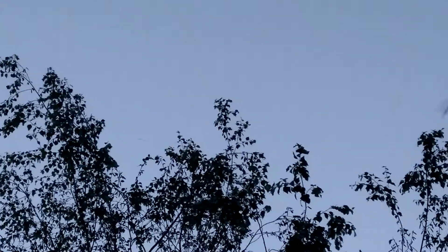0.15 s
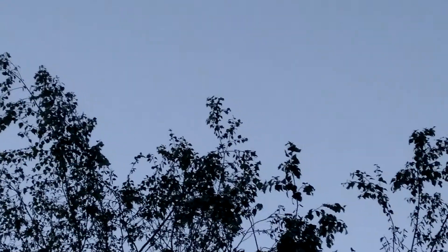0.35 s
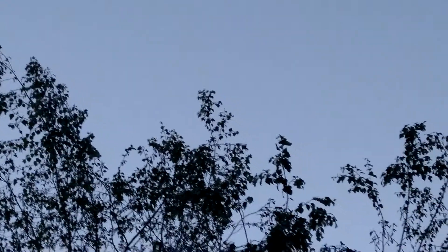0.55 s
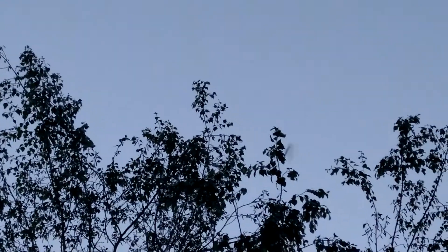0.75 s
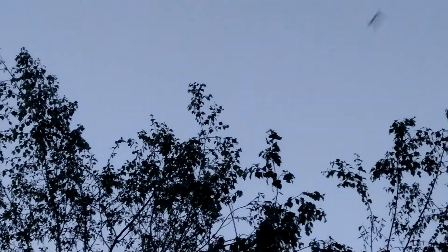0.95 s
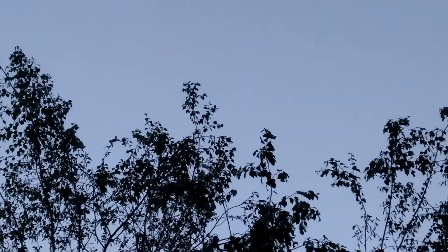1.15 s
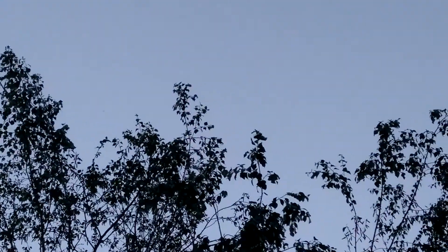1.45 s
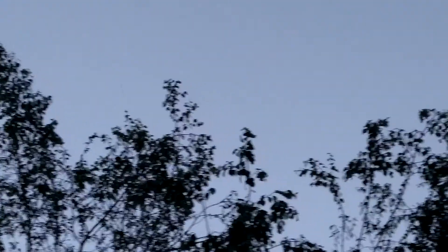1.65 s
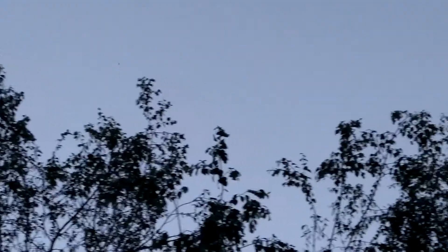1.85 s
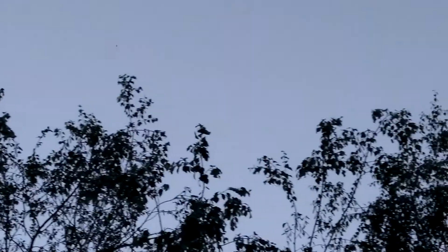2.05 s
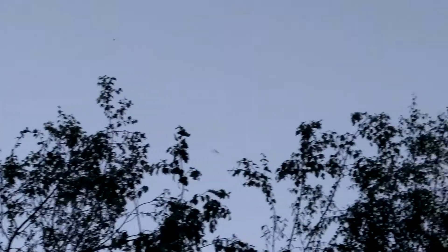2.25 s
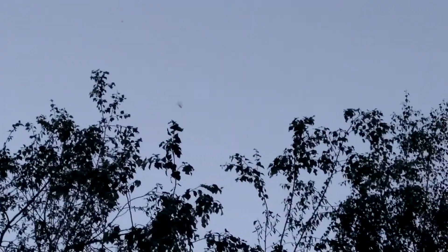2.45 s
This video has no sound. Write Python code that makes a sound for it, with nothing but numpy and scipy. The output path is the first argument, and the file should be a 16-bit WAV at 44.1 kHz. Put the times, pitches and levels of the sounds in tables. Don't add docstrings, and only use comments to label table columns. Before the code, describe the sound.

Outdoor stereo pickup of screaming swifts: shrill trilled whistles swell to a loud, hoarse burst early on, then thin into weaker overlapping calls, with faint distant engine rumble and a tiny bird warble at the end.

```python
import sys
import numpy as np
from scipy import signal
from scipy.fft import rfft, irfft, next_fast_len
from scipy.io import wavfile
from scipy.ndimage import uniform_filter1d, map_coordinates

SR = 44100
rng = np.random.default_rng(int(sys.argv[2]) if len(sys.argv) > 2 else 0)


def level_to_linear(level):
    exponent = np.asarray(level, float) / 20
    return 10 ** exponent


def generate_wav(signal):
    frames = np.transpose(np.atleast_2d(signal))
    scaled = np.clip(frames, -1, 1) * 32767
    pcm = np.round(scaled).astype(np.int16)
    wavfile.write(sys.argv[1], SR, pcm)


N = 114660
T = np.arange(N) / SR


def unit(x):
    return x / np.sqrt(np.mean(x ** 2) + 1e-20)


def along(points, hz):
    f, v = np.transpose(points)
    return np.interp(np.log(hz + 1), np.log(f + 1), v)


def closed(points):
    return lambda hz: level_to_linear(along(points, hz)) * (hz > points[0][0]) * (hz < points[-1][0])


def filtered(x, response):
    m = next_fast_len(N + 8192)
    return irfft(rfft(x, m) * response(np.fft.rfftfreq(m, 1 / SR)), m)[..., :N]


def wobble(rate_hz, size=N):
    knots = rng.standard_normal(int(size * 400 / SR) + 4)
    return map_coordinates(knots, [T[:size] * min(rate_hz, 400)])


def add(sky, a, voice):
    sky[:, a:a + voice.shape[1]] += voice[:, :N - a]
    return sky


def town_hum():
    # frequency in Hz, density in dB per Hz
    hum_spectrum = [(47, 7), (80, -2), (206, -1.5), (296, -11), (344, -1), (420, -12.5), (635, -10),
                    (2200, -14.5), (4400, -21), (5460, -77), (9240, -120)]
    # frequency in Hz, left-right likeness -1 to 1
    likeness = [(60, 0.57), (240, 0.91), (950, 0.07), (3770, -0.5), (15000, 1)]

    def response(hz):
        turn_rad = np.arccos(np.clip(along(likeness, hz), -1, 1)) / 2
        return closed(hum_spectrum)(hz) * np.array([np.cos(turn_rad), np.sin(turn_rad)])

    mid, side = filtered(rng.standard_normal((2, N)), response)
    level_db = -71 + 0.17 * wobble(5.9) + 1.2 * wobble(6.5)
    return level_to_linear(level_db) * unit(np.array([mid + side, mid - side]))


def engine():
    # time in seconds, load in dB
    load = [(0.0, -100), (0.05, -60), (0.1, -78), (0.73, -63.5), (0.99, -69), (1.059, -60), (1.101, -78),
            (1.61, -104), (1.68, -71), (1.89, -84), (2.579, -58.5), (2.6, -60)]
    centre_hz, width_hz = 58.7, 8.3
    s, db = np.transpose(load)
    noise = rng.standard_normal(N) + 0.096 * rng.standard_normal((2, N))
    throb = unit(filtered(noise, lambda hz: 1 / (1 + ((hz - centre_hz) / width_hz) ** 2)))
    return level_to_linear(np.interp(T, s, db)) * throb


def air_hiss():
    # frequency in Hz, density in dB per Hz
    hiss_spectrum = [(3500, -16), (8000, 2), (9800, -18), (11800, -62), (12300, -42), (15600, -49)]
    return level_to_linear(-68.5) * unit(filtered(rng.standard_normal((2, N)), closed(hiss_spectrum)))


def town():
    return (town_hum() + engine()) * level_to_linear([[1.2], [-1.2]]) + air_hiss()


def puffs():
    # centre in seconds, length in seconds, centre in Hz, width in Hz, level in dB
    swells = [(0.057, 0.045, 124, 193, -67.5), (0.669, 0.1, 230, 970, -59), (0.983, 0.13, 370, 84, -63.5),
              (1.156, 0.053, 963, 213, -74), (2.346, 0.062, 353, 98, -69.5),
              (2.394, 0.0072, 1260, 1484, -70), (0.554, 0.19, 380, 553, -73),
              (0.865, 0.42, 2740, 2580, -71), (1.726, 0.46, 3510, 1100, -72),
              (2.511, 0.0051, 9300, 2500, -80), (2.484, 0.0078, 1410, 1720, -64)]
    out = np.zeros((2, N))
    for s, length_s, centre_hz, width_hz, db in swells:
        a, b = rng.standard_normal((2, N))
        ears = np.array([a + 0.84 * b, a - 0.41 * b])
        band = filtered(ears, lambda hz: hz / (hz + 60) / (1 + ((hz - centre_hz) / width_hz * 2) ** 2))
        out += level_to_linear(db) * unit(band) * np.exp(-((T - s) / length_s * 2) ** 2)
    return out * level_to_linear([[1.5], [-1.5]])


def warbler():
    # time in seconds, pitch in Hz, level in dB
    song = [(2.43, 4130, -75), (2.462, 4430, -63.5), (2.484, 4060, -65), (2.5, 4280, -57.5),
            (2.516, 4420, -63), (2.546, 4200, -65), (2.558, 4270, -65), (2.564, 4520, -62),
            (2.6, 4300, -63)]
    s, hz, db = np.transpose(song)
    pitch_hz = np.interp(T, s, hz) + 22 * wobble(180)
    level_db = np.interp(T, s, db) - 7 + 2.3 * wobble(80)
    tone = np.sin(2 * np.pi * np.cumsum(pitch_hz) / SR) * level_to_linear(level_db)
    return tone * np.clip((T - s[0]) / 0.01, 0, 1) * level_to_linear([[3], [-3]])


def echo(x):
    # frequency in Hz, t60 in seconds
    decay = [(2000, 0.62), (6000, 0.54), (12000, 0.45)]
    hz, t, z = signal.stft(rng.standard_normal((2, SR // 2)), SR, nperseg=256)
    tail = signal.istft(z * level_to_linear(-60 * t / along(decay, hz)[:, None]), SR, nperseg=256)[1]
    return signal.fftconvolve(x, tail / np.linalg.norm(tail[0]), axes=1)[:, :N]


def breath(birds):
    # frequency in Hz, level in dB
    breath_spectrum = [(2400, -16.5), (3300, -32), (4000, -48), (6800, -0.5), (7900, -9), (9300, -6),
                       (11500, -5), (12200, -22)]
    hoarse_start_s, hoarse_end_s, fade_s = 0.425, 2.01, 0.032
    power = uniform_filter1d(uniform_filter1d(birds ** 2, 2500), 2500)
    effort = np.abs(power) ** 0.5
    hoarse = np.clip(np.minimum(T - hoarse_start_s, hoarse_end_s - T) / fade_s, 0.25, 1)
    hiss = unit(filtered(rng.standard_normal((2, N)), closed(breath_spectrum)))
    return level_to_linear(-22.5) * 0.021 * (effort / 0.0049) ** 0.45 * hoarse * hiss


def scream(sky, start_s, hz, gain, pan_db, octave_db, third_db, between_db, rasp_db, depth, jitter):
    flutter_hz, flutter_depth, flutter_bend_rad, flutter_drift = 255, 0.71, 0.27, 0.0629
    pitch_jitter, flicker_db, own_ear_db = 0.99, 1.5, 4
    rasp_width_hz, overtone_rasp_db = 480, 0
    half_db = -45.5
    n = SR * 2 // 3
    a = max(int(start_s * SR), 0)

    def fit(v):
        return np.pad(v[a:a + n], (0, max(a + n - N, 0)), "edge")

    hz, gain, pan_db = fit(hz), fit(gain), fit(pan_db)

    def even(v):
        return v * np.sqrt(np.sum(gain ** 2) / np.sum(gain ** 2 * v ** 2, -1, keepdims=True))

    drift = 1 + flutter_drift * wobble(30.55, size=n)
    flutter = 2 * np.pi * (rng.random() + np.cumsum(flutter_hz * drift) / SR)
    phase = 2 * np.pi * np.cumsum(hz * (1 + pitch_jitter * jitter * wobble(149.88, size=n))) / SR
    bend = flutter_bend_rad * depth * np.sin(flutter + 0.3)
    chop = 1 + flutter_depth * depth * np.cos(flutter)

    skirt = np.exp(-(np.fft.rfftfreq(n, 1 / SR) / rasp_width_hz) ** 2)
    rasp = unit(irfft(rfft(rng.standard_normal((2, n))) * skirt, n))

    own_ears = np.array([wobble(71.5, size=n), wobble(68.7, size=n)])
    turns_db = flicker_db * wobble(53.05, size=n) + own_ear_db * own_ears
    ears = level_to_linear(3.65 * np.tanh(np.maximum(turns_db, 0) / 3) + np.minimum(turns_db, 0))

    def part(half_steps):
        return np.sin(half_steps * phase / 2 + bend)

    whistle = even(chop * ears * (1 + level_to_linear(rasp_db) * rasp) * part(2))
    overtones = level_to_linear(octave_db) * part(4) + level_to_linear(third_db) * part(6)
    overtones = overtones + level_to_linear(half_db) * part(1) + level_to_linear(between_db) * part(3)
    rough = even(chop * ears[::-1, ::-1] * (1 + level_to_linear(overtone_rasp_db) * rasp[::-1, ::-1]))
    voice = gain * (whistle + np.sqrt(2) * rough * overtones) * level_to_linear(np.array([pan_db, -pan_db]) / 2)
    return add(sky, a, voice)


def far(sky, start_s, length_s, first_hz, top_hz, db):
    # octave, third and 3/2 partial in dB, rasp in dB, flutter depth, pitch jitter share
    flock_throat = (-39, -62, -19.5, 1, 1.28, -0.0117)
    rise_share, attack_s, release_s, flock_pan_db = 0.21, 0.057, 0.11, 3.5
    u = np.clip(T - start_s, 0, None)
    hz = top_hz + (first_hz - top_hz) * np.exp(-u / (rise_share * length_s))
    gate = np.clip(u / attack_s, 0, 1) ** 2 * np.clip((length_s - u) / release_s, 0, 1)
    return scream(sky, start_s, hz, level_to_linear(db) * gate, flock_pan_db + 0 * T, *flock_throat)


def near(sky, rows, throat):
    s, hz, db, pan_db = np.transpose(rows)
    gate = np.clip((T - s[0]) / 0.035, 0, 1) * np.clip((s[-1] - T) / 0.065, 0, 1)
    gain = gate * level_to_linear(np.interp(T, s, db))
    return scream(sky, s[0], np.interp(T, s, hz), gain, np.interp(T, s, pan_db), *throat)


def microphone(birds):
    # frequency in Hz, level in dB
    mic_colour = [(4300, -7.5), (4750, -9.5), (5050, -1.5), (13200, -0.5), (13700, -16), (14100, -16),
                  (15000, -14)]
    # frequency in Hz, level in dB
    left_colour = [(3000, 3), (6800, 2.5), (8000, -1), (13000, -19.5)]
    lag_s = 0.0003595

    def response(hz):
        left = level_to_linear(along(left_colour, hz)) * np.exp(-2j * np.pi * hz * lag_s)
        return level_to_linear(along(mic_colour, hz)) * np.array([left, np.ones_like(hz)])

    return filtered(birds, response)


def swifts():
    # time in seconds, pitch in Hz, level in dB, left-right in dB
    first_bird = [(0.0, 4340, -45.5, -8), (0.035, 4575, -52, 11), (0.104, 4786, -48.5, -13),
                  (0.142, 5014, -39.5, -10.5), (0.201, 5627, -35, 4.5), (0.307, 5484, -48, 22),
                  (0.386, 5600, -66, 50), (0.4, 5500, -59, -14)]
    loud_bird = [(0.39, 5345, -29, 5), (0.405, 5530, -26.5, 2.4), (0.425, 5850, -34.5, 3.5),
                 (0.456, 6147, -24, 2.3), (0.505, 6447, -23, 7.1), (0.591, 6630, -23, 11.2),
                 (0.651, 6550, -28.5, 12.8), (0.701, 6540, -22.5, 6.2), (0.72, 6513, -38, 10.1),
                 (0.799, 6730, -33.5, 7.5), (0.858, 6816, -40.5, 13.3), (0.931, 6900, -63, 8.6)]
    partner_bird = [(0.404, 4390, -33, 12.5), (.44, 4765, -36.5, -5.5), (.475, 5200, -40.5, 4),
                    (.51, 5450, -35.5, -1), (0.568, 5627, -37.5, 5), (0.65, 5785, -39.5, 5.5),
                    (0.761, 5670, -46, -4)]
    gliding_bird = [(.86, 5167, -51, 2), (0.951, 5600, -39, 4.6), (1.04, 6174, -39.5, 9),
                    (1.143, 6365, -50, 20.7), (1.258, 6300, -45.5, 2.7)]
    crossing_bird = [(1.248, 4610, -66, 3.4), (1.299, 5300, -52, 4.1), (1.397, 5520, -65, 5.1),
                     (1.503, 5280, -65.5, 1.3), (1.602, 5040, -61, 9.6)]
    last_bird = [(2.148, 5820, -57.5, 1.7), (2.201, 6090, -49, 0.75), (2.301, 6288, -47, 3.4),
                 (2.398, 6344, -66, 16.4), (2.459, 6300, -39, 10.3)]
    # octave in dB, third in dB, partial at 3/2 in dB, rasp in dB,
    # flutter depth 0-1, pitch jitter share
    throats = [
        (-13, -8, -30, -9, 1, 0.0042),
        (-15.5, -70, -26, -4.5, 0.9, 0.0035),
        (-8, -60, -15.5, -0.5, 0.61, 0.0041),
        (-7.5, -50, -14.5, -25, 0.97, 0.0062),
        (3.5, -43, -4.5, -10, 0.9, 0.0125),
        (-12, -50, -11.5, -2.5, 0.94, 0.0097),
    ]
    # start in seconds, length in seconds, first pitch in Hz, top pitch in Hz,
    # level in dB
    flock = [(-.1, 0.24, 5120, 5480, -54), (-.1, 0.45, 5880, 6070, -58), (0.144, 0.37, 6100, 7050, -53.5),
             (0.32, 0.098, 3600, 3824, -44), (0.678, 0.28, 5350, 5530, -43.5),
             (0.721, 0.19, 5860, 6080, -42), (1.12, 0.16, 5200, 5350, -73), (1.233, 0.25, 5806, 6370, -41),
             (1.438, 0.22, 6174, 6480, -44), (1.554, 0.22, 5000, 5970, -47.5),
             (1.598, 0.25, 5950, 6400, -43), (1.808, 0.13, 6000, 6250, -47.5),
             (1.935, 0.19, 4940, 5330, -57), (1.842, 0.17, 6100, 6240, -62.5),
             (2.061, .16, 6200, 6410, -69), (1.93, 0.24, 5910, 6400, -55), (2.171, 0.16, 4870, 5500, -53.5),
             (2.418, 0.26, 6140, 5716, -56), (2.45, 0.31, 5700, 5050, -62.5)]
    tracks = (first_bird, loud_bird, partner_bird, gliding_bird, crossing_bird, last_bird)
    birds = np.zeros((2, N))
    for rows, throat in zip(tracks, throats):
        birds = near(birds, rows, throat)
    for row in flock:
        birds = far(birds, *row)
    birds = birds + level_to_linear(-1) * echo(birds)
    birds = birds + breath(birds)
    return microphone(birds)


def scene():
    return town() + puffs() + warbler() + swifts()


def low_pass(x):
    return signal.sosfilt(signal.butter(12, 15670, fs=SR, output="sos"), x)


def record(dry):
    return low_pass(dry)


dry = scene()
out = record(dry)
generate_wav(out)
```